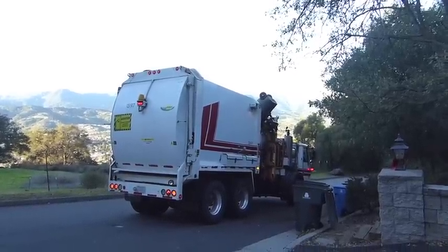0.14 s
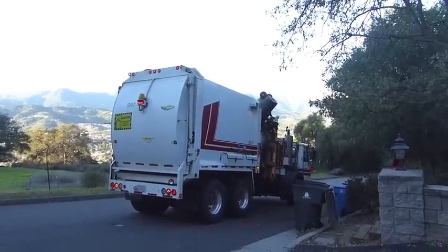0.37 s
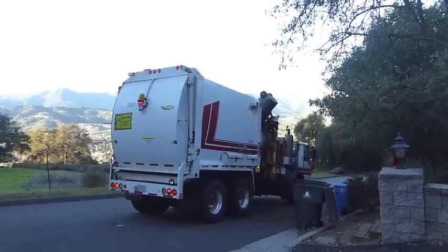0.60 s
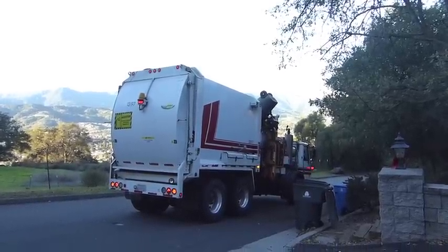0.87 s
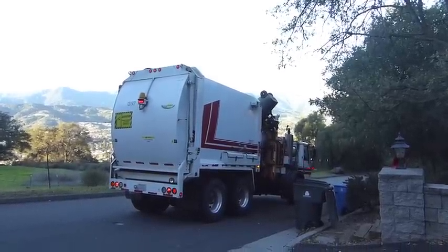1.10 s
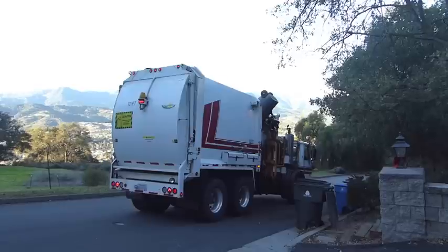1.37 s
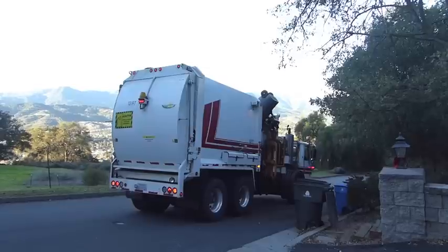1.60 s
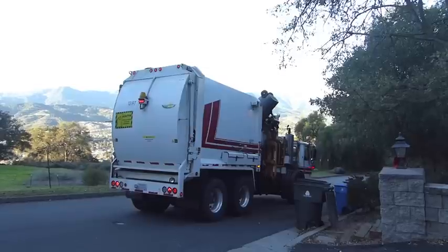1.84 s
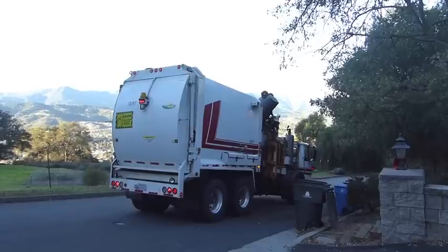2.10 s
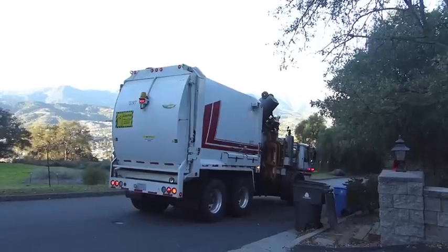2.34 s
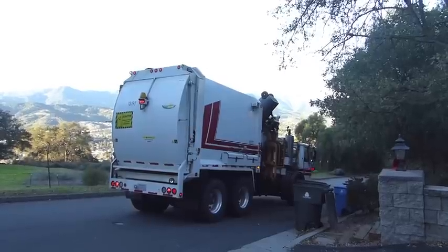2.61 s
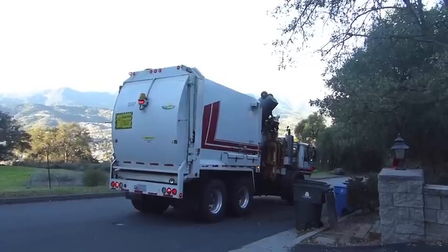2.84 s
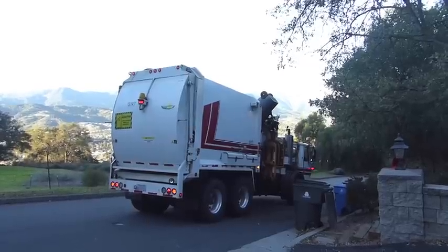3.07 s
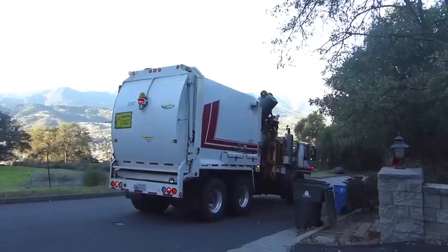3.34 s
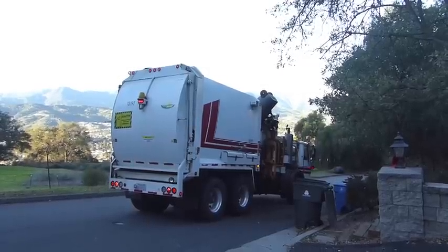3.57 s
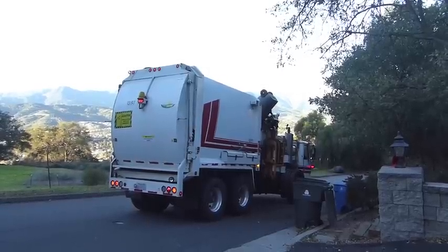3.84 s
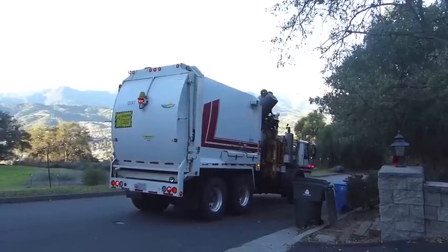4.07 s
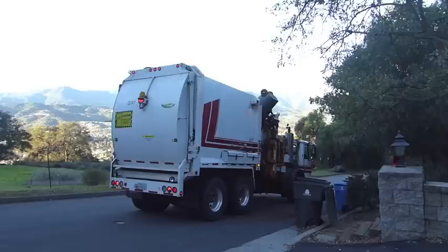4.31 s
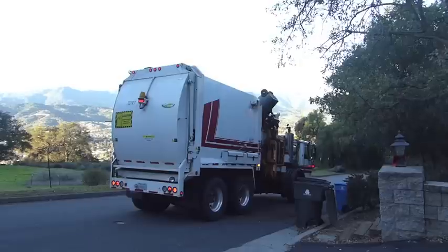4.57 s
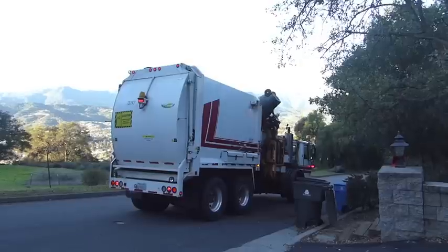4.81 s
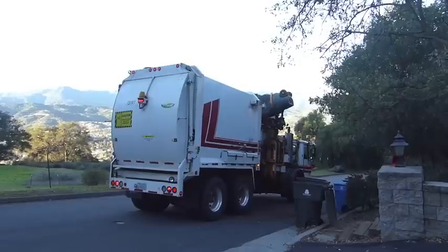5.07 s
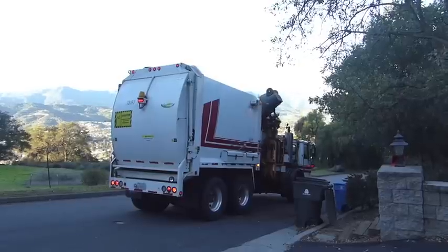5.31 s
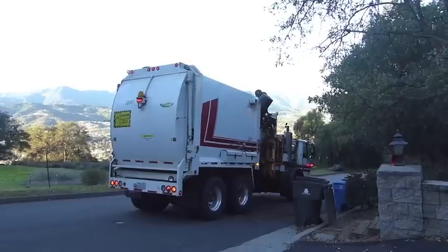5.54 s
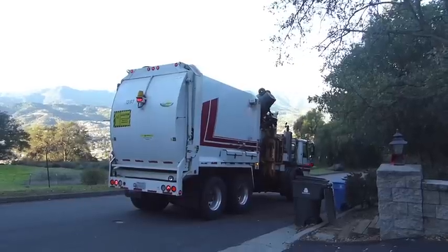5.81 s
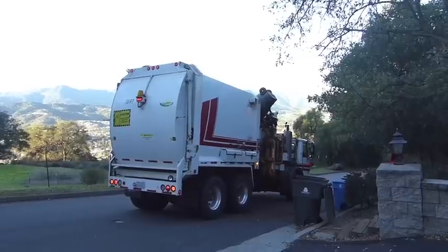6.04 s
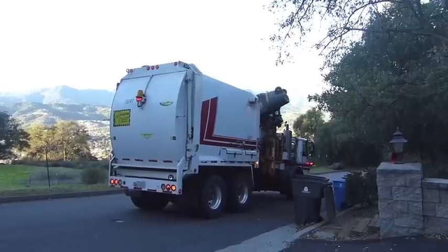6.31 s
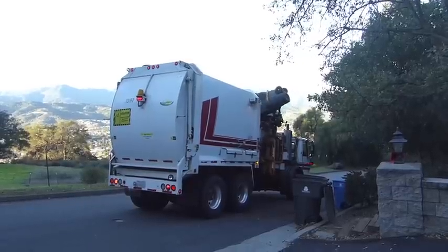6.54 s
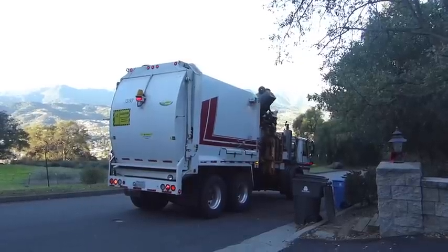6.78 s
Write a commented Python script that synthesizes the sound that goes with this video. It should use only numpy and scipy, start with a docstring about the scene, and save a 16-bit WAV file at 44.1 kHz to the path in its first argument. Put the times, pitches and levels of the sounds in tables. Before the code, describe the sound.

A constant bright rush of escaping air covers a humming engine and whirring machinery. Around the middle, dull bin thumps begin, the engine pitch slides down sharply and its drone fades, and short strained hydraulic tones sing. Later, sharper knocks rattle in clusters while the hiss carries on. Close, fixed outdoor microphone, almost mono, with little deep bass.

```python
"""Compressed air or oil hisses loudly from a refuse truck a few metres off: noise in narrow wandering bands.
Under it the engine at a fast idle drones in sines locked to the shaft, until the revs sag.
Noise bands whirr and rumble with the load, short sines sing under strain,
and the lifted bin thumps and knocks on the hopper as ringing modes with a rattle; nearly mono."""
import sys
import numpy as np
from scipy import signal
from scipy.fft import rfft, irfft
from scipy.io import wavfile
from scipy.ndimage import uniform_filter1d

SR = 44100
rng = np.random.default_rng(int(sys.argv[2]) if len(sys.argv) > 2 else 0)


def field_ratio(decibels):
    """Amplitude ratio for a level in dB (20 dB per decade); scalars and array-likes work."""
    return 10 ** (np.asarray(decibels, dtype=float) / 20)


def wrap_up_sound(samples):
    """Save the sound to the file named by the first command line argument, as 16-bit audio."""
    columns = np.atleast_2d(samples).T
    # keep every value between -1 and 1, then stretch to whole-number steps
    tamed = np.clip(columns, -1, 1)
    steps = np.round(tamed * 32767).astype(np.int16)
    wavfile.write(sys.argv[1], SR, steps)


N = 304731  # length in samples


def clock():
    """Time of every sample in seconds."""
    return np.arange(N) / SR


def frequencies():
    """Frequency of every bin of a whole-length spectrum, in Hz."""
    return np.fft.rfftfreq(N, 1 / SR)


def along(table):
    """Draws straight lines between the rows of a (time, value) table, one value a sample."""
    s, value = np.transpose(table)
    return np.interp(clock(), s, value)


def shaped(x, points):
    """Colours a sound by (Hz, dB) points, joined on a logarithmic frequency scale."""
    hz, db = np.transpose(points)
    f = np.maximum(frequencies(), 1)
    return irfft(rfft(x) * field_ratio(np.interp(np.log(f), np.log(hz), db)), N)


def bell(x, centre, width):
    """Smooth hump, 1 at the centre and exp(-2) one width away."""
    return np.exp(-2 * ((x - centre) / width) ** 2)


def unit(x):
    """Scales to rms 1."""
    return x / np.std(x)


def walk(rate):
    """Smoothed random wandering with spread 1; rate is the number of new random values a second."""
    k = int(SR / rate)
    held = np.repeat(rng.standard_normal(N // k + 1), k)
    return unit(uniform_filter1d(uniform_filter1d(held, k), k)[:N])


def step(s):
    """Rises smoothly from 0 to 1 around a moment in seconds."""
    return 0.5 + 0.5 * np.tanh((clock() - s) / 0.096)


# Colours of the whirr, the rumble and the deep rumble. Each row: frequency in Hz, relative level in dB per Hz.
WHIRR_COLOUR = [(60, -61), (300, -33), (500, -5.5), (800, -4.5), (1300, -3), (2200, -3), (3000, -8),
                (5000, -6), (9000, -27)]
RUMBLE_COLOUR = [(120, -34), (200, -6), (250, -1.5), (340, 2.5), (420, -4), (700, -24)]
DEEP_COLOUR = [(60, -19), (110, 2.5), (170, 4.5), (260, -24.5)]
# Strain on the lifting gear. Each row: time in seconds, load in dB over idle.
LIFT_LOAD = [(0, -2.5), (.8, -4), (1.2, -3.5), (2.3, 1), (2.55, 4.5), (2.75, -3.5), (3.5, -1), (3.83, 5),
             (4.02, 2.5), (4.4, 3.5), (4.87, 0.5), (5.2, 3), (5.5, 6.5), (5.85, 1.5), (6.04, -4.5),
             (6.35, 3.5), (6.91, 3.5)]


def machinery():
    """Whirr, rumble and deep rumble are noise bands that rise with the load, each wavering on its own."""
    whirr_db, rumble_db, deep_db = -34, -48, -67.5  # starting levels at idle
    whirr_share, deep_share = 0.21, 0.58  # dB gained per dB of load
    arm_starts_s, arm_deep_db = 3.66, 7.5  # the deep rumble steps up when the arm starts to move
    bin_over_s, bin_over_db = 5.9, -2.5  # the whirr eases once the bin is over the hopper
    load_db = along(LIFT_LOAD)
    whirr = unit(shaped(rng.standard_normal(N), WHIRR_COLOUR))
    rumble = unit(shaped(rng.standard_normal(N), RUMBLE_COLOUR))
    deep = unit(shaped(rng.standard_normal(N), DEEP_COLOUR))

    whirr_db = whirr_db + whirr_share * load_db + bin_over_db * step(bin_over_s) + 0.58 * walk(4.215)
    rumble_db = rumble_db + load_db + 1.2 * walk(4.07)
    deep_waver_db = np.minimum(4.0 * walk(10.) + 4.0 * walk(4.), 3)
    deep_db = deep_db + deep_share * load_db + arm_deep_db * step(arm_starts_s) + deep_waver_db
    return field_ratio(whirr_db) * whirr + field_ratio(rumble_db) * rumble + field_ratio(deep_db) * deep


# Tones of the drone. Each row: multiple of the shaft speed, relative level in dB.
SHAFT_TONES = [(6, -28), (8, -27), (9, -26), (12, -9), (13, -18), (14, -19), (15, -9.5), (16, -9),
               (17, -11.5), (18, -9), (19, -10), (20, -10), (21, -17), (22, -20), (24, -19), (25, -13),
               (28, -15), (31, -12), (35, -15), (38, -5), (39, -6), (40, 0), (41, -13), (42, -5), (43, -11),
               (44, -7), (45, -3), (48, -12), (49, -6), (59, -10), (68, -14), (74, -9), (80, -8), (84, -1)]
# The revs over time. Each row: time in seconds, shaft speed in Hz (turns a second).
SHAFT_SPEED = [(0, 18.99), (1.6, 19.04), (3.7, 19.045), (3.92, 18.95), (4.12, 19.2), (4.3, 18.9),
               (4.45, 18.6), (4.65, 15.6), (4.9, 12.2), (5.05, 11.8), (6.6, 11.6), (6.75, 12.2),
               (6.91, 13.6)]


def drone():
    """Gear and firing tones locked to the shaft, fading as revs sag; the pump sings while the revs change."""
    idle_hz, drone_db, drone_db_per_hz = 19, -47.5, 2.5
    pump_order, pump_db, pump_full_hz_per_s = 20, -55, 9  # the pump is loudest when revs change this fast
    speed = along(SHAFT_SPEED)
    change = np.abs(uniform_filter1d(np.gradient(speed) * SR, SR // 10))
    turn = 2 * np.pi * np.cumsum(speed) / SR  # shaft angle in radians

    tones = 0
    for multiple, db in SHAFT_TONES:
        wobble_db = 1.6 * walk(3.87)
        tones = tones + field_ratio(db + wobble_db) * np.sin(multiple * turn + 2 * np.pi * rng.random())
    effort = np.minimum(change / pump_full_hz_per_s, 1) ** 2
    pump = field_ratio(pump_db + 5.2 * walk(12.)) * effort * np.sin(pump_order * turn)
    tones_gain = field_ratio(drone_db + drone_db_per_hz * (speed - idle_hz))
    return np.sqrt(2) * (tones_gain * tones + pump)  # root 2 makes the levels rms


# The hydraulics sing briefly under strain. Each row: middle in seconds, length in seconds (bell width),
# pitch at the middle in Hz, glide in Hz per second, rms level at the middle in dB.
STRAIN_TONES = [(4.33, 0.16, 722, 0, -44), (4.48, .08, 365, 0, -46), (5.48, 0.2, 590, 0, -52),
                (5.54, .16, 310, 650, -47), (5.675, 0.11, 925, 0, -43), (5.79, .1, 260, 0, -48)]


def whines():
    """Short sines from the strained hydraulics, steady or rising, that swell and fade."""
    out = np.zeros(N)
    for s, length, hz, glide, db in STRAIN_TONES:
        t = clock() - s
        tone = np.sin(2 * np.pi * (hz + glide * t / 2) * t)
        out += np.sqrt(2) * field_ratio(db) * bell(t, 0, length) * tone
    return out


# The bin hits the hopper. Each row: time in seconds, peak of the ring in dB,
# middle of the modes struck in Hz, spread in octaves.
BIN_BLOWS = [(3.835, -43, 200, 1.8), (3.862, -27, 220, 2.1), (3.882, -29, 330, 1.3), (3.962, -34, 150, 2.1),
             (4.003, -30, 262, 1.6), (4.05, -38, 300, 1.1), (4.175, -37, 744, .4), (4.2, -39, 333, 0.77),
             (4.244, -33, 249, 1.1), (4.29, -35, 230, 1.4), (4.371, -38, 300, 1.3), (4.849, -36, 280, 1.2),
             (4.992, -35, 1490, .7), (5.222, -32, 860, 0.49), (5.283, -30, 835, 0.4),
             (5.308, -38, 250, 0.97), (5.335, -35, 360, 0.52), (5.347, -30, 940, .5), (5.398, -39, 330, .8),
             (5.566, -30, 860, .5), (5.607, -33, 900, 0.56), (5.671, -37, 340, 1.3),
             (5.734, -38, 870, 0.37), (6.148, -42, 300, 1.1), (6.293, -30, 720, 0.5),
             (6.35, -26.5, 680, 1.1), (6.357, -29, 1550, .9), (6.36, -41, 170, 1.2),
             (6.405, -31, 780, 0.92), (6.43, -35, 850, 1.1), (6.486, -35, 1000, 1), (6.534, -38, 795, 0.83)]
# Ways the hopper rings. Each row: nominal frequency in Hz, relative level in dB,
# time to fall by 60 dB in seconds.
HOPPER_MODES = [(95, -3, .09), (140, -5, .08), (175, -2, .07), (225, 0, .12), (310, 0, .11), (365, -1, .1),
                (440, -6, .09), (545, -5, .08), (645, 2, .1), (735, 2, .1), (850, -2, .07), (940, -3, .06),
                (1250, -5, .04), (1450, -1, .05), (1720, 3, .05), (2100, -2, .04)]


def blows():
    """Each blow rings the hopper modes near its middle; loose panels and rubbish rattle on after it."""
    push_s = 0.004  # the push builds over this time
    rattle_db, rattle_t60_s = -11, 0.3  # starting rattle rms against the peak of the ring
    t = np.arange(SR // 2) / SR
    octaves = np.log2(np.maximum(np.fft.rfftfreq(len(t), 1 / SR), 1))
    push = np.minimum(t / push_s, 1)
    out = np.zeros(N + SR)
    for s, db, middle, spread in BIN_BLOWS:
        ring = np.zeros(len(t))
        for hz, mode_db, t60 in HOPPER_MODES:
            chance = rng.standard_normal()  # varies level, pitch and phase together
            gain = field_ratio(mode_db + 2.8 * chance) * bell(np.log2(hz / middle), 0, spread)
            tone = np.sin(2 * np.pi * hz * (1 + 0.02 * chance) * t + 0.7 * chance)
            ring += gain * tone * 1000. ** (-t / t60)
        loose = rfft(rng.standard_normal(len(t))) * bell(octaves, np.log2(middle), spread)
        rattle = unit(irfft(loose, len(t))) * 1000. ** (-t / rattle_t60_s)
        blow = push * (ring / np.abs(ring * push).max() + field_ratio(rattle_db) * rattle)
        out[int(s * SR):][:len(t)] += field_ratio(db) * blow
    return out[:N]


# Brighter patches in the hiss. Each row: middle in seconds, length in seconds (bell width),
# centre in Hz, width in Hz, level at the middle in dB.
HISS_SWELLS = [(0.303, 0.43, 7740, 250, -35), (1.54, 0.13, 7600, 400, -33), (2.08, 0.15, 6200, 700, -32),
               (5.0, 0.62, 6770, 500, -32), (5.723, 0.38, 9100, 600, -27), (6.482, 0.2, 5660, 600, -30),
               (6.598, 0.5, 7350, 1100, -32)]


def swells():
    """The hiss swells in one band at a time: band noise under a smooth hump."""
    noise = rfft(rng.standard_normal(N))
    out = np.zeros(N)
    for s, length, hz, width_hz, db in HISS_SWELLS:
        patch = unit(irfft(noise * bell(frequencies(), hz, width_hz), N))
        out += field_ratio(db) * bell(clock(), s, length) * patch
    return out


# Colour of the escaping jet. Each row: frequency in Hz, relative level in dB per Hz.
JET_COLOUR = [(1470, -29), (2500, -12), (2910, -15), (3120, -10), (3440, -13.5), (4080, -4), (4500, -5.5),
              (9800, 0.5), (11900, -7), (14600, -9.5), (15500, -19)]
# Air escaping. Each row: time in seconds, hiss level in dB before flutter.
AIR_PRESSURE = [(0, -21), (.5, -21), (.85, -21), (1.15, -21), (2.5, -20.5), (2.62, -20), (2.75, -22),
                (3.1, -22), (3.48, -21.5), (3.75, -22.5), (3.92, -23), (4.02, -21), (4.68, -20.5),
                (4.9, -22), (5.48, -20.5), (5.75, -21), (5.87, -20.5), (6.2, -22), (6.56, -20.5),
                (6.91, -19.5)]


def hiss():
    """Jet noise in narrow bands, each wandering as the air path shifts; more pressure is brighter."""
    usual_db, tilt_per_db = -20, 0.14  # dB per octave of tilt gained for each dB over the usual level
    level_db = along(AIR_PRESSURE) + 0.48 * walk(6.5)  # the flow flutters a little
    tilt_db = tilt_per_db * (level_db - usual_db)
    jet = rfft(unit(shaped(rng.standard_normal(N), JET_COLOUR)))
    # sixths of an octave around 9 kHz; everything below 2.5 kHz shares one band
    band = np.round(6 * np.log2(np.maximum(frequencies(), 2500) / 9000))
    out = np.zeros(N)
    for b in np.unique(band):
        out += irfft(jet * (band == b), N) * field_ratio(tilt_db * b / 6 + 0.45 * walk(3.))
    return field_ratio(level_db) * out


def scattered(x):
    """Short echoes off truck, road and walls comb the noise; the pattern drifts as arm and air move."""
    echo_db, t60_s, hold_s = -5.5, 0.071, 0.25  # echoes against direct sound, decay, time between patterns
    lag = np.arange(SR // 10) / SR
    out = np.zeros(N)
    for s in np.arange(0, N / SR + hold_s, hold_s):
        echoes = rng.standard_normal(len(lag)) * 1000. ** (-lag / t60_s) * np.minimum(lag / 0.002, 1)
        fade = np.cos(np.pi / 2 * np.clip((clock() - s) / hold_s, -1, 1))
        out += fade * signal.fftconvolve(x, echoes / np.linalg.norm(echoes))[:N]
    return (x + field_ratio(echo_db) * out) / np.sqrt(1 + field_ratio(2 * echo_db))


# Peaks and dips on the way. Each row: centre in Hz, width in Hz, boost or cut in dB.
PATH_BUMPS = [(500, 58, -4.5), (780, 130, 3.5), (900, 84, 5), (1120, 46, -0.5), (1222, 52, -8.5),
              (1370, 44, -7.5), (1450, 97, 4.5), (1664, 24, 6.5), (1958, 57, -9.5), (2080, 107, 5.5),
              (2336, 70, 5), (2370, 47, -6), (2824, 75, -8.5), (3193, 24, 6), (3500, 195, 0),
              (4310, 220, -1.5), (4440, 100, -1.5), (5890, 100, 2.5), (6665, 310, -5), (6795, 280, 6),
              (7430, 210, 1), (8460, 330, 1), (10370, 220, 3.5), (11540, 170, 5), (11150, 180, 6.5),
              (11980, 210, 9), (12700, 230, 5), (13080, 250, 2.5)]


def coloured_path(x):
    """Panels and road reinforce some frequencies and cancel others."""
    db = sum(bump_db * bell(frequencies(), hz, wide) for hz, wide, bump_db in PATH_BUMPS)
    return irfft(rfft(x) * field_ratio(db), N)


# Narrow bands that drop out and fill again. Each row: centre in Hz, width in Hz.
DROPOUT_BANDS = [(450, 31), (520, 37), (1180, 73), (1340, 63), (1930, 73), (2450, 58), (2740, 68),
                 (2890, 98), (3470, 96), (3720, 67), (4450, 79)]


def hollowed(x):
    """Scales narrow bands by their own capped random walks, so each drops out for moments."""
    whole = rfft(x)
    out = x
    for hz, wide in DROPOUT_BANDS:
        gain = field_ratio(11 * np.minimum(walk(18) + 0.38, 0.15))  # 11 dB for each unit of the walk
        out = out + irfft(whole * bell(frequencies(), hz, wide) ** 0.5, N) * (gain - 1)
    return out


# How wide the sound is. Each row: frequency in Hz, side level minus middle level in dB.
SIDE_LEVEL = [(60, -11), (200, -17), (700, -17), (1300, -15.5), (2400, -18), (4400, -21), (8000, -21),
              (15000, -22)]


def width(mid):
    """Faint phase-scrambled side sound that switches on and off, with rarer, sharper bursts higher up."""
    together_db, alone_db, treble_db, rate = 9.5, 3.0, 4.5, 22.  # treble_db: extra per half octave over 2 kHz
    band = np.round(4 * np.log2(np.maximum(frequencies(), 250) / 1000))  # quarter octaves
    other = rfft(shaped(mid, SIDE_LEVEL)) * np.exp(2j * np.pi * rng.random(N // 2 + 1))
    gate_db = together_db * np.tanh(2 * walk(rate) + 0.5)  # shared by all bands
    out = np.zeros(N)
    for b in np.unique(band):
        own_db = (alone_db + treble_db * max(b - 4, 0) / 2) * walk(rate)
        flicker = field_ratio(gate_db + own_db)
        out += irfft(other * (band == b), N) * flicker / np.sqrt(np.mean(flicker ** 2))
    return out


def scene():
    """The hiss scatters; hiss and machinery share one coloured path; the other sounds join after it."""
    noise = hollowed(coloured_path(scattered(hiss()) + machinery()))
    mid = noise + swells() + drone() + whines() + blows()
    side = width(mid)
    return np.array([mid + side, mid - side])


def top_cut(x):
    """Nothing passes above the cut-off."""
    return signal.sosfilt(signal.butter(12, 15680, fs=SR, output="sos"), x)


def record(dry):
    """The microphone cuts the bass; the converter adds a small, slightly wandering offset."""
    mic_low_hz, offset, wander_db = 107, -0.004, -68.5
    bass_cut = signal.butter(6, mic_low_hz, "high", fs=SR, output="sos")
    cut = signal.sosfilt(bass_cut, dry)
    # half of the wander's power is shared by both channels
    noise = rng.standard_normal(N) + rng.standard_normal(dry.shape)
    wander = signal.sosfilt(signal.butter(2, 30, fs=SR, output="sos"), noise)
    mix = cut + offset + field_ratio(wander_db) * unit(wander)
    return top_cut(mix)


dry = scene()
out = record(dry)
wrap_up_sound(out)
```